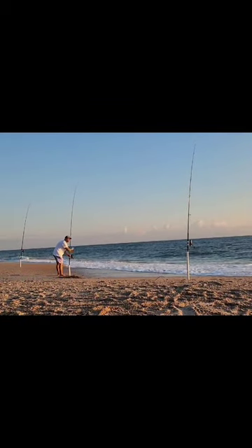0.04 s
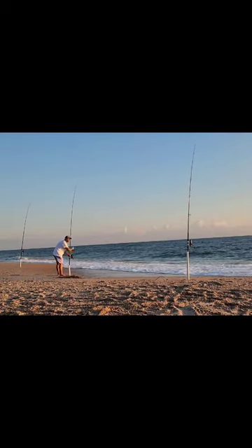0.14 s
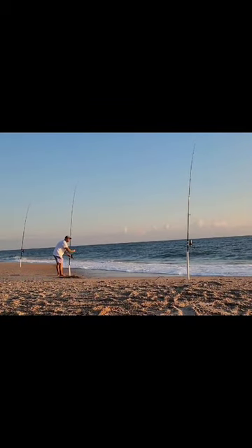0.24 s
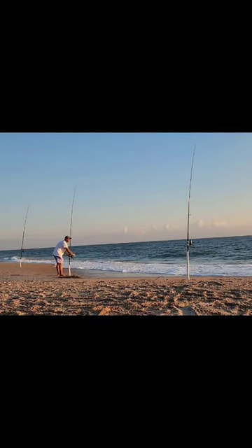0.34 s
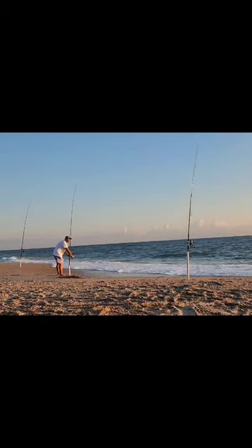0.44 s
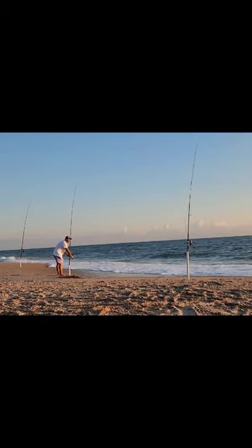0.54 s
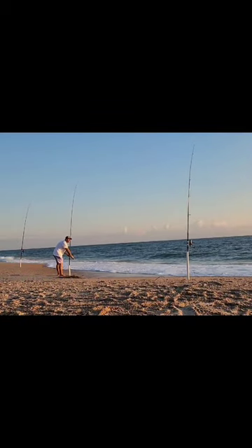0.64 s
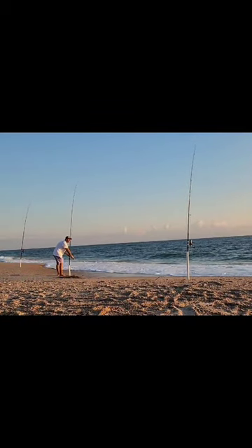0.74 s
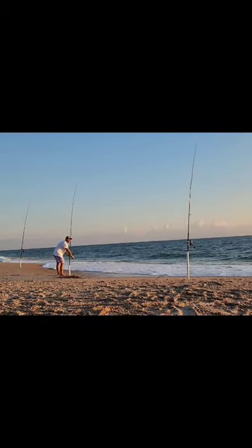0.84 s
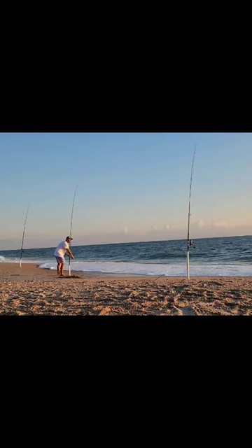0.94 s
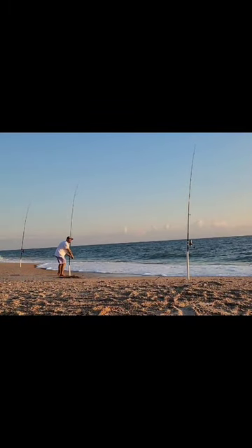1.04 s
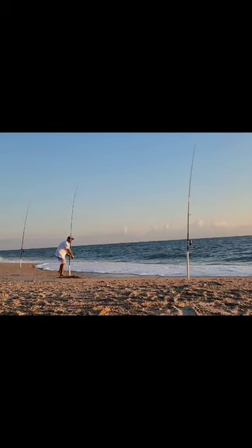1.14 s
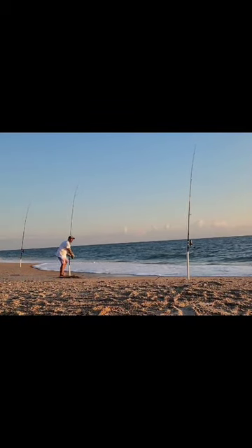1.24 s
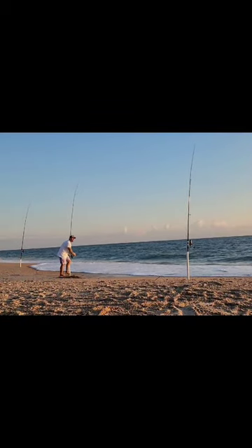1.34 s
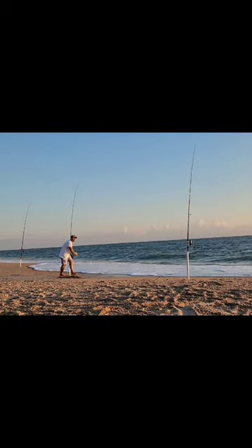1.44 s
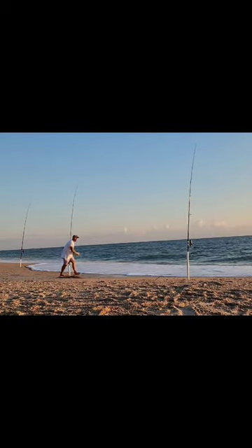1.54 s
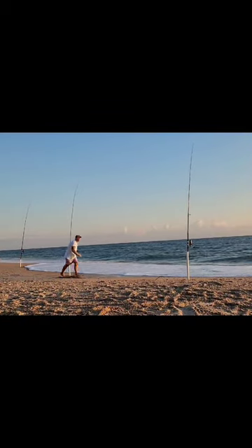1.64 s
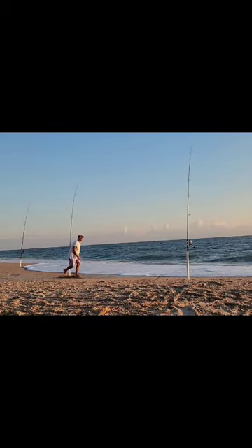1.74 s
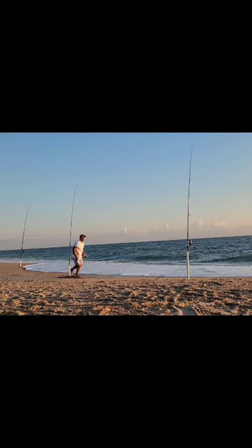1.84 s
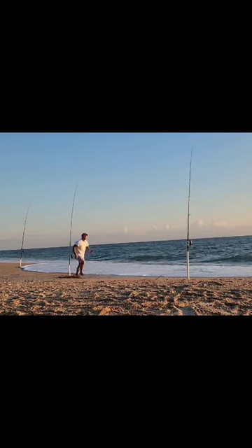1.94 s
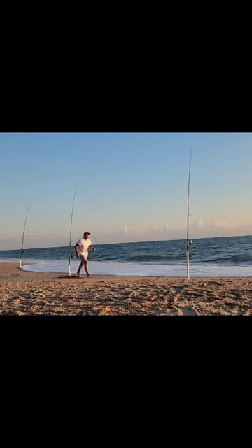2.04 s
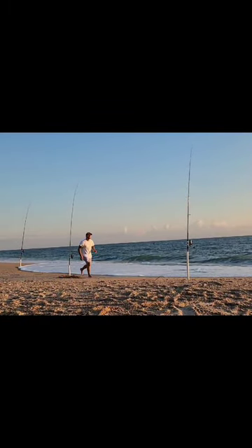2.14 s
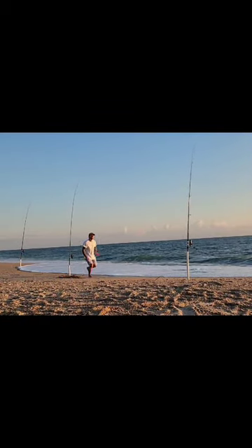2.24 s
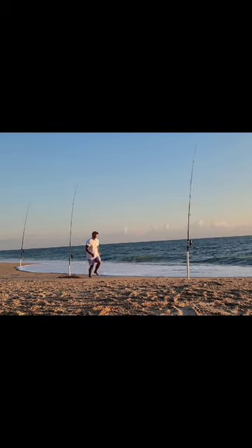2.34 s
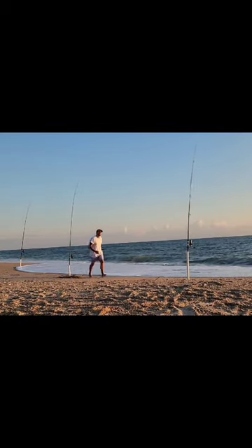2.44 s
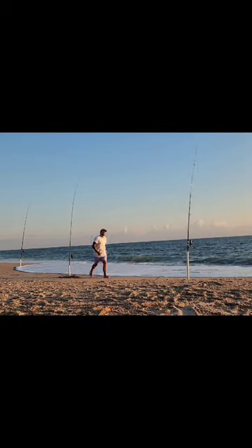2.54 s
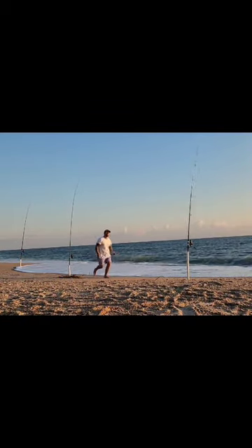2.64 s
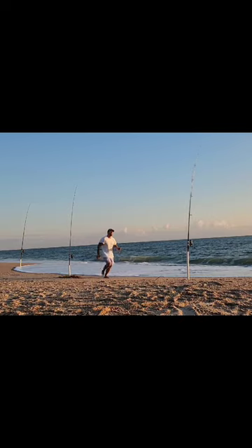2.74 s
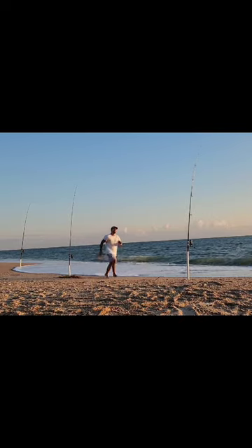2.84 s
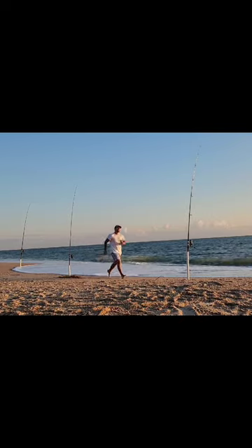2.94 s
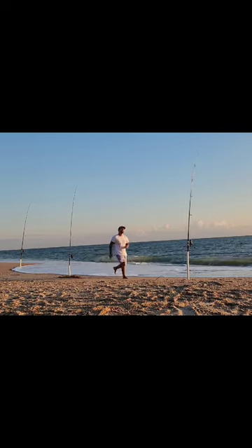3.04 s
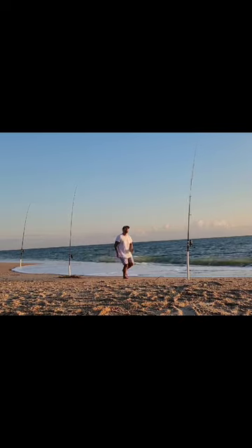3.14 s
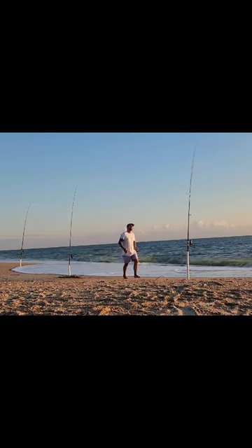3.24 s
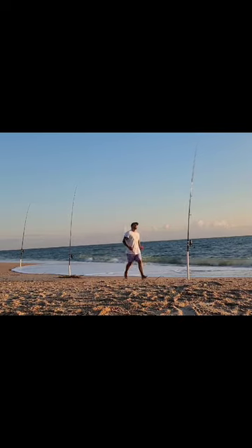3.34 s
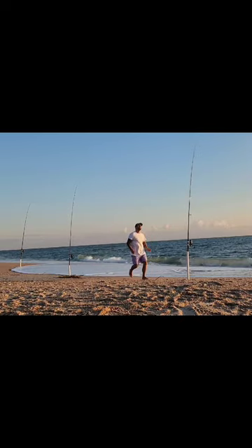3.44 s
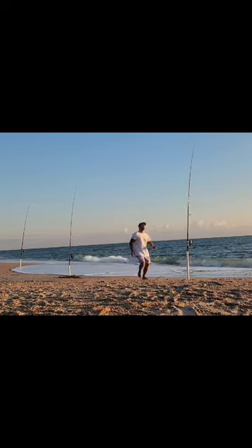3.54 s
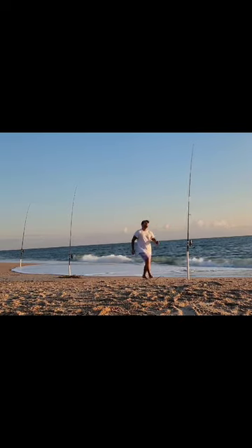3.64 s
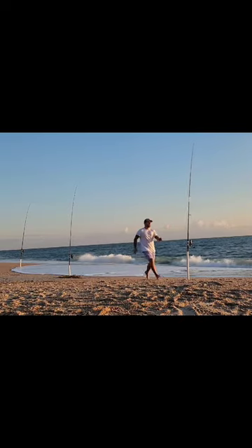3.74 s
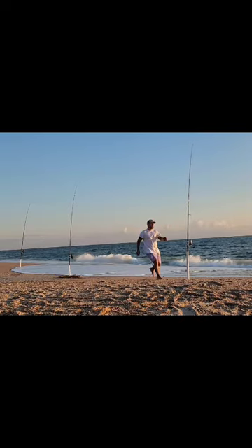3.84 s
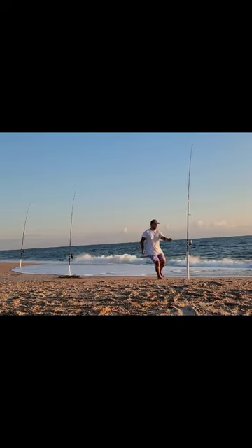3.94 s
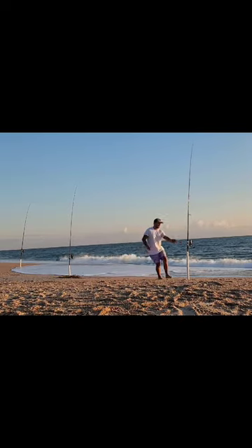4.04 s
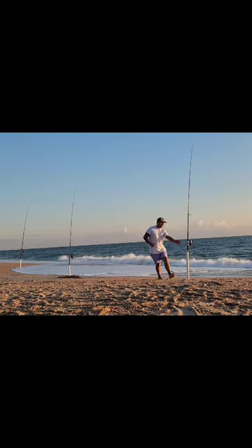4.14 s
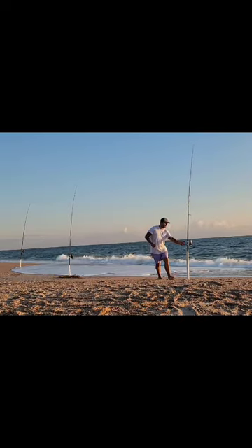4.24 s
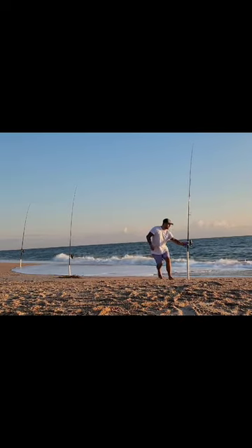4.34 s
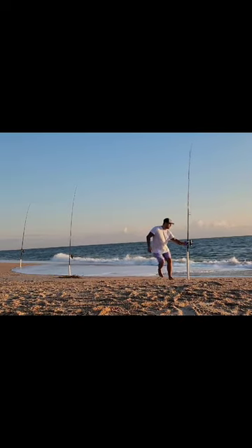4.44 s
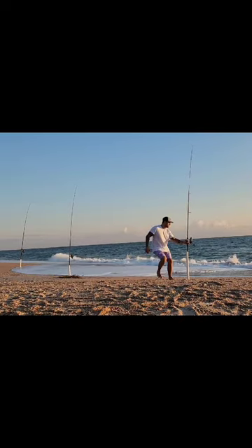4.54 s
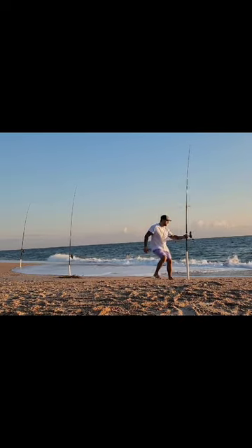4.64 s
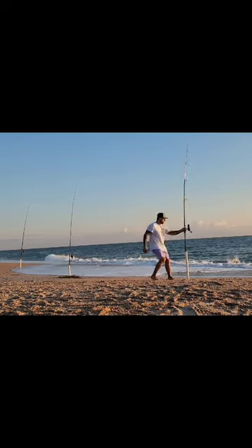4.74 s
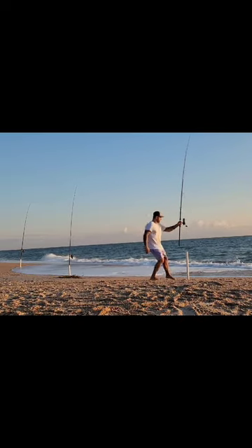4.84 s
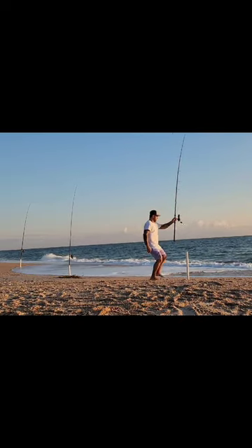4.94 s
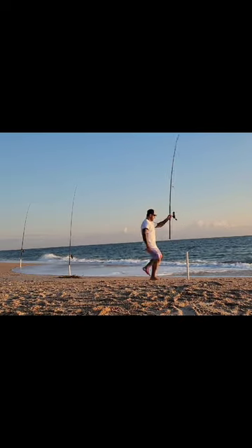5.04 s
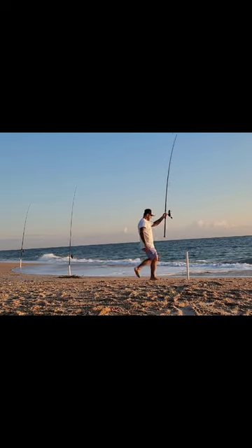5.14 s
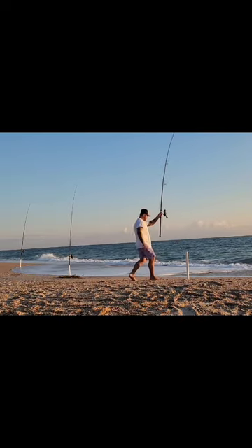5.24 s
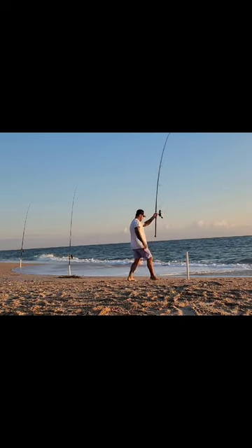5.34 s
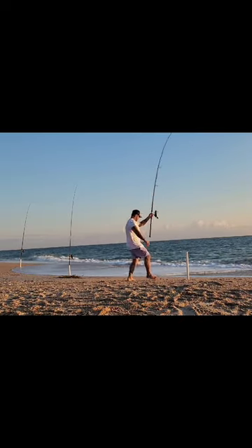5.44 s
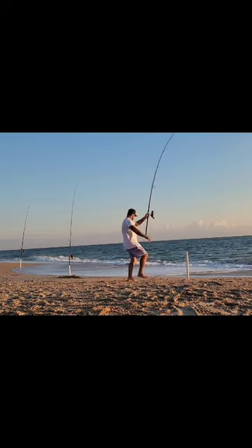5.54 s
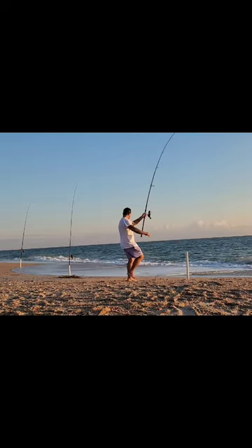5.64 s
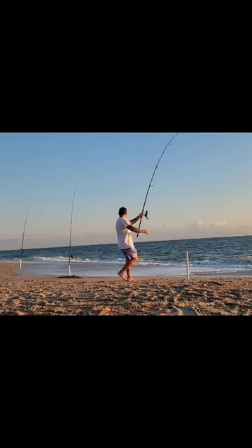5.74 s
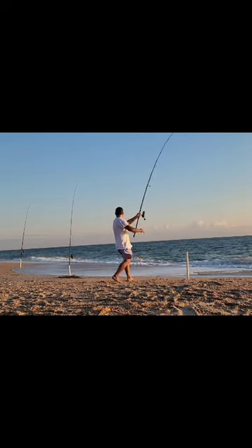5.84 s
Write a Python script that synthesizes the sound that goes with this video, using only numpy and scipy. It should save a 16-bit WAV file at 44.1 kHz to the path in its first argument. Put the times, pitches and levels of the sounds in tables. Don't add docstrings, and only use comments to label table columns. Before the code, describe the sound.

Wind thuds on the microphone and moans across a tube; a brief sand squeak, then a breaking wave swells and its foam fizzes closer.

```python
import sys
import numpy as np
from scipy import signal
from scipy.fft import rfft, irfft, next_fast_len
from scipy.io import wavfile
from scipy.ndimage import uniform_filter1d

SR = 44100
rng = np.random.default_rng(int(sys.argv[2]) if len(sys.argv) > 2 else 0)


def field_ratio(decibels):
    return 10 ** (np.asarray(decibels, dtype=float) / 20)


def master_out(mix):
    frames = np.transpose(np.atleast_2d(mix))
    ceiling = np.clip(frames, -1, 1)
    pcm = np.round(ceiling * 32767).astype(np.int16)
    wavfile.write(sys.argv[1], SR, pcm)


N = 259749
T = np.arange(N) / SR
LONG = next_fast_len(N)

FRAME, HOP = 1024, 256
FRAMES = N // HOP + 5
HZ = np.fft.rfftfreq(FRAME, 1 / SR)

# f/Hz, density/dB
ROAR_COLOUR = [(250, -9.5), (380, -2.5), (450, 0), (650, -4.5), (950, -8.5), (1250, -8), (1450, -12.5),
               (1900, -76)]
CHURN_COLOUR = [(1000, -29), (1350, 0.5), (1480, 8), (1750, 1), (1950, -0.5), (2100, -3.5), (2250, -21),
                (2700, -26.5)]
FOAM_COLOUR = [(1400, -1.5), (2150, 0.5), (2690, -4), (3170, -0.5), (3900, -3), (4300, -3.5), (4700, -4.5),
               (5300, -5), (6100, -10), (7300, -10), (8200, -17.5), (10000, -22)]
SPRAY_COLOUR = [(6500, -5), (8300, 1.5), (9500, -0.5), (10300, -3.5), (10900, -6.5), (11500, 0.5),
                (12300, 3), (13200, -7), (13800, -5), (14200, -5.5)]
# t/s, level/dB
BREAKER = [(0, -40.5), (.18, -39), (.42, -44), (1.1, -44.5), (2.0, -43), (2.43, -40.5), (2.52, -37.5),
           (2.77, -36.5), (2.87, -41), (3.12, -38), (3.45, -38), (3.58, -33.5), (3.74, -29.5), (4.4, -30),
           (4.9, -33.5), (5.6, -34.5), (5.7, -36), (5.89, -37)]
# t/s, level/dB
BACKWASH = [(0, -48.5), (.4, -48.5), (1.1, -55), (1.55, -49.5), (2.0, -47.5), (2.6, -44.5), (3.1, -51),
            (3.5, -41.5), (4.2, -40), (4.7, -42), (5.2, -42.5), (5.6, -46), (5.89, -50)]
# t/s, level/dB
FOAM_EDGE = [(0, -57.5), (.4, -59.5), (1.1, -66.5), (2.02, -66), (2.14, -61), (2.45, -59.5), (3.12, -54),
             (3.4, -54), (3.8, -55), (4.2, -52), (4.6, -51), (5.1, -51), (5.4, -50), (5.62, -46),
             (5.76, -46), (5.89, -45)]
# t/s, length/s, lift/dB
SPLASHES = [(0.143, .005, 9), (2.15, .01, 6), (2.25, .015, 5), (2.46, .01, -2), (2.538, 0.011, 4),
            (3.68, .01, 5.5), (4.104, 0.023, -3), (4.213, 0.022, 1.5), (4.27, .03, 1.5), (4.45, 0.034, 2),
            (5.168, .02, 4.5)]
# t/s, first notch f/Hz, strength/0-1
SAND_MIRROR = [(0, 1150, 0.24), (.6, 1190, 0.08), (1.2, 1310, 0.39), (1.8, 1220, 0.41), (2.4, 1240, 0.76),
               (3.0, 1160, 0.93), (3.35, 1270, 0.55), (3.55, 1140, 0.28), (4.3, 1270, 0.14),
               (5.0, 1040, 0.05), (5.89, 1090, 0.3)]
BREAKER_CHURN_DB, BREAKER_FOAM_DB = -10, -12
EDGE_FOAM_DB, EDGE_FOAM_SHARE = -46, 0.71
SPLASH_RISE_DB_S, SPLASH_FALL_DB_S = 500, 250

# f/Hz, density/dB
THUD_COLOUR = [(12, -12), (26, 4), (38, 20.5), (50, 6), (60, 18), (80, -48.5)]
RUMBLE_COLOUR = [(40, -2), (52, 30.5), (64, 30.5), (82, 31), (95, 19), (125, -46)]
BOOM_COLOUR = [(70, -3), (110, 4), (150, -1.5), (220, -2.5), (320, -7.5), (420, -13.5), (600, -59.5)]
# t/s, level/dB
BREEZE = [(0, -39), (.55, -41), (.82, -41.5), (1.0, -35), (1.4, -39.5), (2.1, -42), (2.45, -46.5),
          (3.0, -46), (3.53, -45), (3.6, -31.5), (3.75, -31.5), (4.3, -29.5), (4.7, -31), (4.95, -35.5),
          (5.6, -33), (5.65, -44), (5.89, -37.5)]
# t/s, length/s, level/dB, size/0-1 (small rumbles, large thuds)
EDDIES = [(.22, 0.047, -30.5, 0.63), (.43, 0.05, -35, .4), (0.549, 0.029, -32, .6), (.65, 0.023, -34, .6),
          (.92, 0.018, -32, 0.68), (1.02, 0.024, -26, 0.42), (1.94, 0.035, -27, .1), (2.07, 0.018, -36, .9),
          (2.25, 0.11, -30.5, .4), (2.459, 0.036, -35, .7), (2.54, .02, -34, 0.37), (2.65, .02, -38, 0.42),
          (2.8, 0.041, -31, 0.56), (3.191, 0.026, -33, 0.88), (3.28, .02, -34, .2), (3.59, 0.018, -33, .05),
          (3.7, 0.053, -22, 0.098), (3.79, .05, -24.5, .4), (4.01, 0.045, -27, 0.35),
          (4.1, 0.078, -23, 0.23), (4.26, .02, -39, 0.28), (4.5, .08, -28, 0.67), (4.68, .04, -26, .5),
          (4.78, .05, -22.5, 0.17), (5.0, 0.015, -42, .2), (5.15, 0.041, -24.5, 0.093),
          (5.36, 0.039, -22, 0.24), (5.51, .02, -35, 0.35), (5.58, .02, -29, 0.23), (5.76, .03, -31, .8)]
EDDY_RISE_DB_S, EDDY_FALL_DB_S = 350, 268
THUD_UNDER_DB, EDDY_BOOM_DB, BREEZE_BOOM_DB, BREAKER_BOOM_DB = -9.5, -8, 5, 0

# t/s, length/s, level/dB, f/Hz
PUFFS = [(0, .11, -32, 96.7), (0.15, 0.052, -24.5, 98.9), (0.362, 0.029, -26.5, 96.3),
         (.56, .05, -33.5, 95.5), (0.727, 0.035, -34.5, 98.5), (0.878, .22, -26, 97.81),
         (1.208, 0.047, -27, 100.8), (1.4, 0.035, -28.5, 99.5), (1.525, .26, -26.5, 98.5),
         (1.867, 0.069, -24.5, 97.1), (2.598, 0.22, -36.5, 98.8), (2.92, 0.035, -30.5, 106.1),
         (3.031, 0.034, -29, 98.3), (3.12, .05, -28.5, 100.2), (3.283, .03, -28, 98.24),
         (3.405, 0.027, -30, 98.1), (3.474, 0.022, -29, 99.16), (3.556, 0.12, -26, 98.9),
         (3.746, 0.061, -27, 99), (3.839, 0.41, -23.5, 100), (4.324, 0.031, -27.5, 97.9),
         (4.562, .06, -25, 100.2), (4.674, 0.017, -42, 96.2), (4.774, 0.041, -28.5, 101.5),
         (4.918, 0.041, -23.5, 109.1), (5.05, 0.2, -28.5, 106), (5.374, .07, -28, 104.1),
         (5.52, 0.07, -25, 95), (5.72, 0.029, -36, 99.7), (5.824, .04, -26, 94.8)]
# t/s, length/s, level/dB
FIFTHS = [
    (.1, .1, -39),
    (.72, .25, -39),
    (1.12, .25, -37),
    (1.55, .2, -40),
    (2.1, .17, -40),
]
PUFF_RISE_DB_S, PUFF_FALL_DB_S, IDLE_DB = 420, 340, -48

# t/s, length/s, start f/Hz, level/dB, second partial/dB
SQUEAKS = [
    (2.108, .016, 2540, -47, -14),
    (2.137, .013, 2620, -40, -7),
    (2.158, .013, 2580, -39.5, -5),
    (2.177, .014, 2500, -40.5, -5),
    (2.232, .026, 2420, -44.5, -9),
    (2.258, .024, 2230, -46, -7),
]
# t/s, length/s, level/dB
SCUFFS = [
    (.138, .014, -49),
    (2.15, .012, -54),
    (2.247, .03, -58),
    (2.373, 0.024, -53),
    (3.228, .03, -49),
    (5.17, .03, -58),
]
# t/s, length/s, f/Hz, level/dB
CHIP = (3.2325, .009, 4990, -31)
SAG_SHARE, QUICK_S = .14, .013


def surf():
    frame_t = np.arange(FRAMES) * HOP / SR
    sand_db = mirror_db(frame_t)
    shallow = column(SAND_MIRROR, frame_t, order=2)
    churn_lean_db = 28.0 * shallow * np.clip(np.log2((HZ[:, None] + 1) / 1750), -1, .4)
    roar_lean_db = 8.1 * shallow * np.clip(np.log2((HZ[:, None] + 1) / 600), -1, .4)

    patter_db = lumps(hz=38.0)
    lift_db = bursts(SPLASHES, np.transpose(SPLASHES)[2], SPLASH_RISE_DB_S, SPLASH_FALL_DB_S, rest_db=0)

    breaker_db = column(BREAKER, T, order=1)
    edge_db = column(FOAM_EDGE, T, order=1)
    churn_db = together(breaker_db + BREAKER_CHURN_DB, column(BACKWASH, T, order=1))
    edge_foam_db = EDGE_FOAM_DB + EDGE_FOAM_SHARE * (edge_db - edge_db.mean())
    foam_db = together(breaker_db + BREAKER_FOAM_DB, edge_foam_db)

    roar = water(ROAR_COLOUR, patchy_db=1.0, tilt_db=sand_db + roar_lean_db)
    roar *= field_ratio(breaker_db + 0.073 * lift_db + 0.15 * patter_db)
    churn = water(CHURN_COLOUR, patchy_db=1.2, tilt_db=sand_db + churn_lean_db)
    churn *= field_ratio(churn_db + 0.28 * lift_db + 0.42 * patter_db)
    foam = water(FOAM_COLOUR, patchy_db=0.87, tilt_db=sand_db)
    foam *= field_ratio(foam_db + 0.55 * lift_db + 0.45 * patter_db)
    spray = water(SPRAY_COLOUR, patchy_db=0.5, tilt_db=0)
    spray *= field_ratio(edge_db + 1.0 * lift_db + 0.66 * patter_db)
    return roar + churn + foam + spray


def water(colour, patchy_db, tilt_db, gurgle_db=1.2):
    real, imaginary, chance = rng.standard_normal((FRAMES, len(HZ), 3)).T
    patches = evened(uniform_filter1d(uniform_filter1d(chance, size=10, axis=0), size=10, axis=1))
    gurgles = evened(uniform_filter1d(uniform_filter1d(chance[::-1], size=2, axis=0), size=6, axis=1))
    level_db = read(colour, HZ)[:, None] + patchy_db * patches + gurgle_db * gurgles + tilt_db
    spectra = (real + 1j * imaginary) * field_ratio(level_db)
    return evened(signal.istft(spectra, nperseg=FRAME, noverlap=FRAME - HOP)[1][:N])


def mirror_db(frame_t):
    turn = np.exp(1j * np.pi * HZ[:, None] / column(SAND_MIRROR, frame_t, order=1))
    strength = np.clip(column(SAND_MIRROR, frame_t, order=2), 0, .9) / (1 + (HZ[:, None] / 2600) ** 2)
    return 20 * np.log10(abs(1 + strength * turn))


def wind():
    _, _, db, size = np.transpose(EDDIES)
    size = np.clip(size, 0, 1)
    breeze_db = column(BREEZE, T, order=1)
    large_db = db + 20 * np.log10(np.sin(size * np.pi / 2) + 0.042)
    small_db = db + 20 * np.log10(np.cos(size * np.pi / 2) + 0.019)
    large_db = bursts(EDDIES, large_db, EDDY_RISE_DB_S, EDDY_FALL_DB_S)
    small_db = bursts(EDDIES, small_db, EDDY_RISE_DB_S, EDDY_FALL_DB_S)
    boom_db = together(breeze_db + BREEZE_BOOM_DB, small_db + EDDY_BOOM_DB,
                       column(BREAKER, T, order=1) + BREAKER_BOOM_DB)

    thud = low_noise(THUD_COLOUR, steady=0.65, span_s=0.025)
    thud *= field_ratio(together(breeze_db + THUD_UNDER_DB, large_db))
    rumble = low_noise(RUMBLE_COLOUR, steady=1.0, span_s=0.052)
    rumble *= field_ratio(together(breeze_db, small_db))
    boom = low_noise(BOOM_COLOUR, steady=1.0, span_s=0.22)
    boom *= field_ratio(boom_db + 2.04 * lumps(hz=21.0))
    return thud + rumble + boom


def low_noise(colour, steady, span_s):
    spectrum = rfft(rng.standard_normal(LONG)) * field_ratio(read(colour, np.fft.rfftfreq(LONG, 1 / SR)))
    x = evened(irfft(spectrum, LONG)[:N])
    span = round(span_s * SR)
    power = uniform_filter1d(uniform_filter1d(x ** 2, size=span), size=span)
    return evened(x / (power + 0.023) ** (np.clip(steady, 0, 1) / 2))


def moan():
    s, length, db, hz = np.transpose(PUFFS)
    level_db = bursts(PUFFS, db, PUFF_RISE_DB_S, PUFF_FALL_DB_S, rest_db=IDLE_DB)
    pitch_hz = np.interp(T, s + length / 2, hz) + 1.532 * lumps(hz=4.22)
    turns = 2 * np.pi * np.cumsum(pitch_hz) / SR
    fifth_db = bursts(FIFTHS, np.transpose(FIFTHS)[2], rise_db_s=105, fall_db_s=102, rest_db=-49.5)
    fifth_db = fifth_db + 2.6 * lumps(hz=2.4)
    tone = field_ratio(level_db) * np.sin(turns) + field_ratio(fifth_db) * np.sin(3 / 2 * turns)
    flutter_db = 0.94 * lumps(hz=33.0) + 1.3 * lumps(hz=9.0)
    return np.sqrt(2) * tone * field_ratio(flutter_db)


def steps():
    out = np.zeros(N)
    for s, length, start_hz, db, second_db in SQUEAKS:
        end_hz = start_hz * (1 - SAG_SHARE * np.sqrt(QUICK_S / length))
        turns = 2 * np.pi * np.cumsum(np.linspace(start_hz, end_hz, round(length * SR))) / SR
        stack = np.sin(turns) + field_ratio(second_db) * np.sin(2 * turns) + field_ratio(-11.5) * np.sin(3 * turns)
        uneven = uniform_filter1d(rng.standard_normal(2000), size=12)[:len(turns)] * np.sqrt(12)
        stack *= 1 + 0.23 * uneven
        add(out, s, field_ratio(db + 6.0) * stack * np.hanning(len(turns)))

    s, length, hz, db = CHIP
    t = np.arange(0, length, 1 / SR)
    add(out, s, field_ratio(db) * np.sin(2 * np.pi * hz * t) * np.hanning(len(t)))

    for s, length, db in SCUFFS:
        grit = np.diff(rng.standard_normal(2000))[:round(length * SR)]
        add(out, s, field_ratio(db) * grit * signal.windows.tukey(len(grit), .4))
    return out


def bursts(rows, levels_db, rise_db_s, fall_db_s, rest_db=-99):
    t = T[::64]
    shapes = []
    for row, db in zip(rows, levels_db):
        early_s = np.maximum(row[0] - t, 0)
        late_s = np.maximum(t - row[0] - row[1], 0)
        shapes.append(db - rise_db_s * early_s - fall_db_s * late_s)
    return np.interp(T, t, np.maximum(np.max(shapes, axis=0), rest_db))


def lumps(hz):
    z = rfft(rng.standard_normal(LONG))
    return evened(irfft(z / (1 + (np.fft.rfftfreq(LONG, 1 / SR) / hz) ** 2), LONG)[:N])


def together(*levels_db):
    return 10 * np.log10(sum(field_ratio(2 * np.asarray(db)) for db in levels_db))


def evened(x):
    return x / np.sqrt(np.mean(x ** 2) + 1e-20)


def read(colour, hz):
    f, value = np.transpose(colour)
    return np.interp(np.log(hz + 1), np.log(f + 1), value, left=-90)


def column(rows, t, order):
    rows = np.array(rows)
    return np.interp(t, rows[:, 0], rows[:, order])


def add(mix, s, sound):
    part = mix[round(s * SR):][:len(sound)]
    part += sound[:len(part)]


def scene():
    return (surf() + wind() + moan() + steps())[None]


def low_pass(x):
    return signal.sosfilt(signal.butter(12, 13870, fs=SR, output="sos"), x)


def record(dry):
    return low_pass(dry)


dry = scene()
out = record(dry)
master_out(out)
```